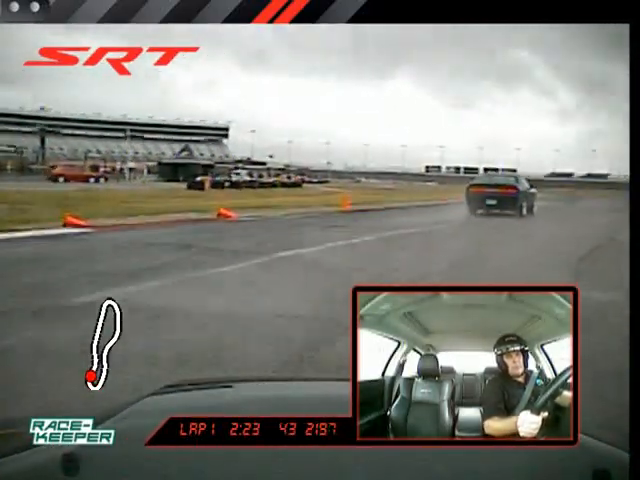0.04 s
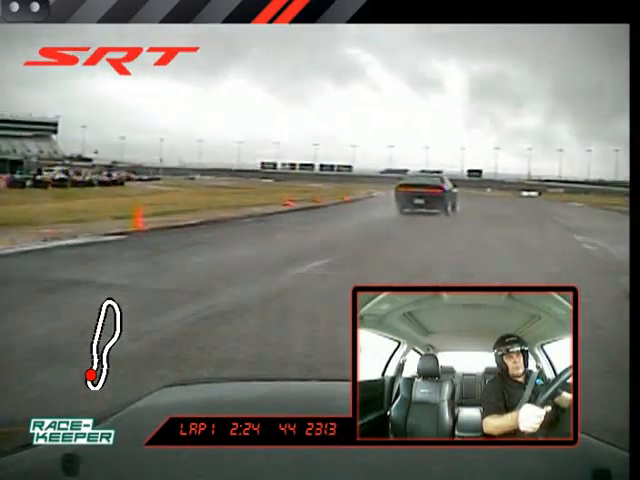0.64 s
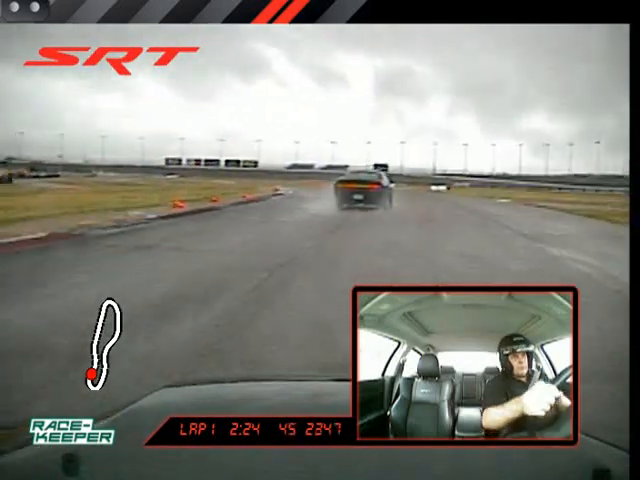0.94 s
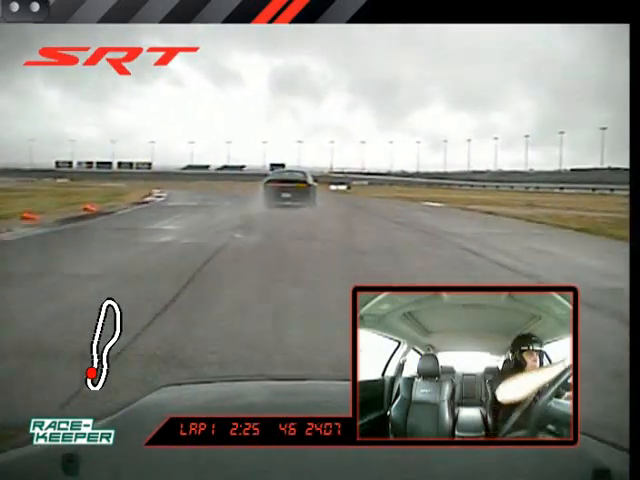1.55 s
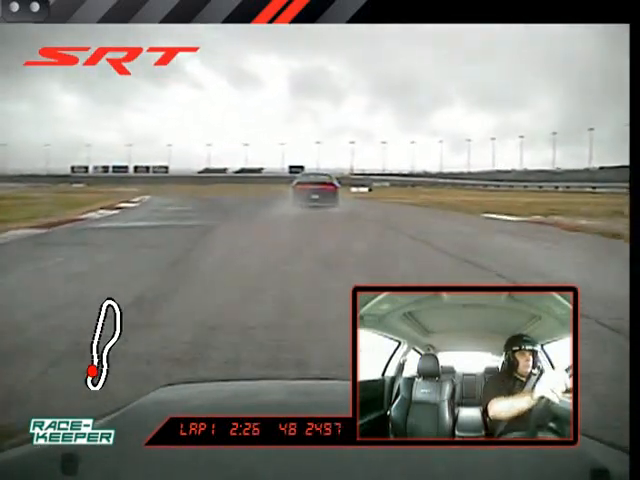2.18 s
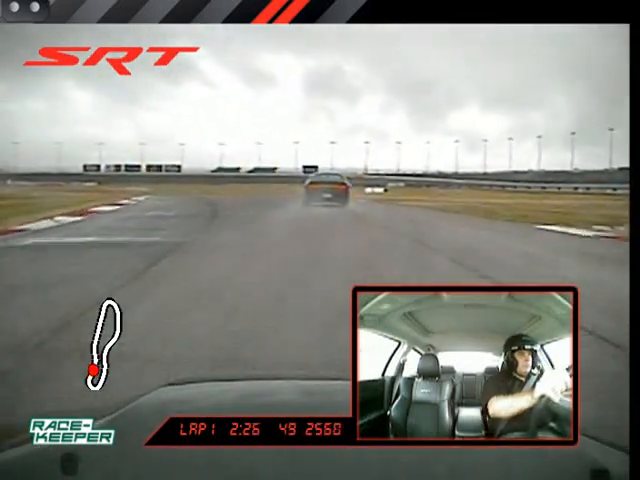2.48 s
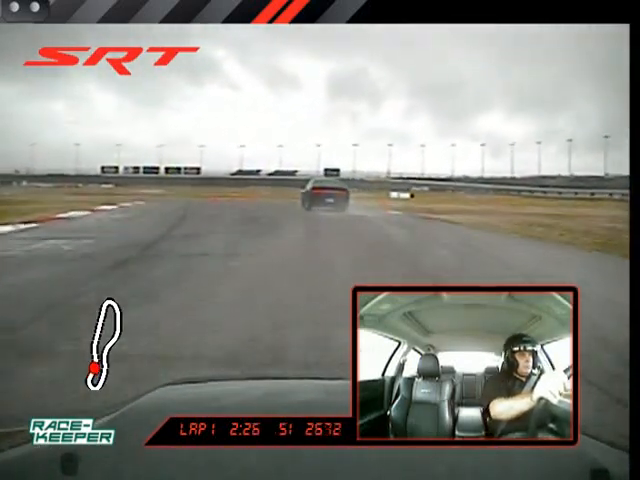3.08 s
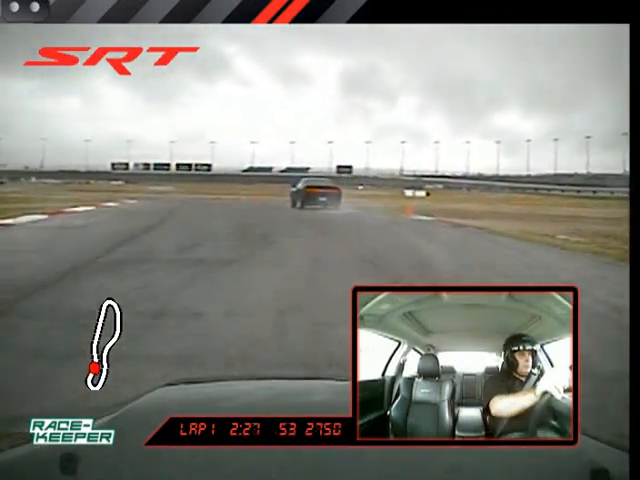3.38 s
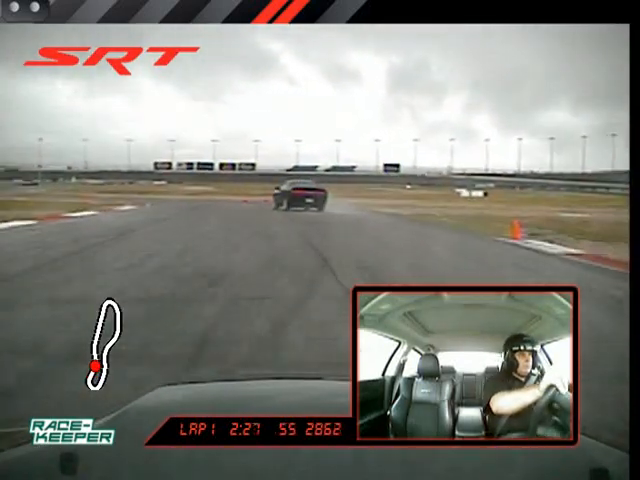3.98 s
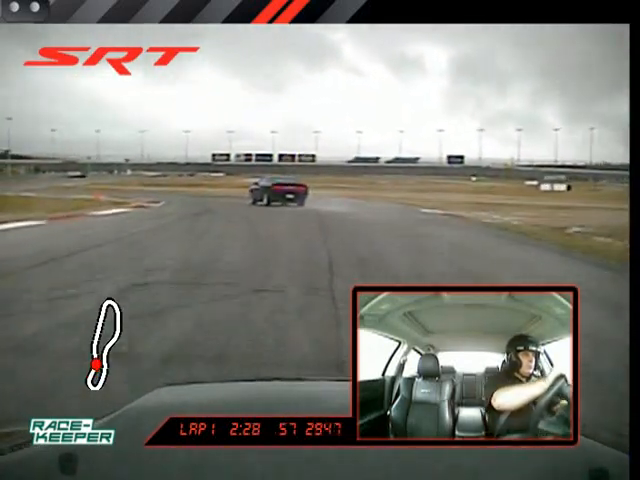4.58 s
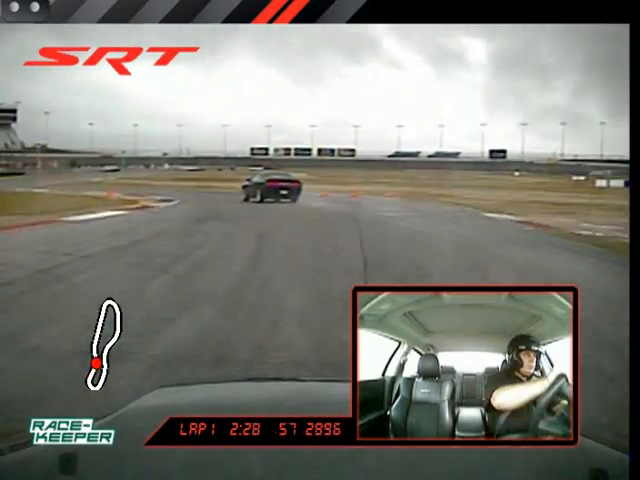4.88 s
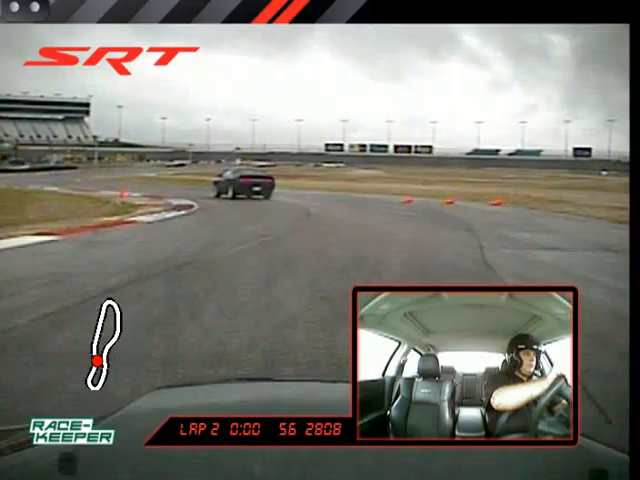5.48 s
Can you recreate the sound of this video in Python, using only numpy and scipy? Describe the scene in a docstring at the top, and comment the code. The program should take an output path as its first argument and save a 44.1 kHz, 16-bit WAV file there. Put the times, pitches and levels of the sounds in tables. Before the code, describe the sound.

A V8 car engine throbs and revs up, then eases off, heard from inside over tyre roar, with light scuffs and clicks.

```python
"""Inside a V8 car on a damp race track. It rolls through a bend, pulls from 2400 to 3000 rpm and lifts
off at four seconds. Uneven firing makes a harmonic series that throbs through the cabin's resonances,
over the broadband noise of road, tyres and wind; bumps make the cabin air boom. While the wheel is
wound over, something, probably a sleeve or belt, scuffs by stick-slip friction and the trim clicks."""
import sys
import numpy as np
from scipy import signal
from scipy.fft import rfft, irfft, next_fast_len
from scipy.io import wavfile
from scipy.ndimage import uniform_filter1d

SR = 44100
rng = np.random.default_rng(int(sys.argv[2]) if len(sys.argv) > 2 else 0)


def unload_wav(signal):
    """Save mono or channel-first audio to the path in sys.argv[1] as 16-bit WAV at rate SR, clipped to [-1, 1]."""
    wavfile.write(
        sys.argv[1],
        SR,
        np.round(np.clip(np.atleast_2d(signal).T, -1, 1) * 32767).astype(np.int16),
    )


N = 248724
TIME = np.arange(N) / SR


def from_db(db):
    """Amplitude ratio of a level in decibels."""
    return 10 ** (np.asarray(db) / 20)


def rms_one(x):
    """Normalisation to unit rms."""
    return x / np.sqrt(np.mean(x ** 2) + 1e-20)


def in_time(rows):
    """Linear interpolation of each column of a curve to every sample."""
    time_s, *columns = np.transpose(rows)
    return [np.interp(TIME, time_s, column) for column in columns]


def ramp(start_s, length_s):
    """Linear rise from 0 to 1, then held."""
    return np.clip((TIME - start_s) / length_s, 0, 1)


def at_hz(spectrum, hz):
    """Spectral level in dB, interpolated in log frequency."""
    points_hz, points_db = np.transpose(spectrum)
    return np.interp(np.log(hz), np.log(points_hz), points_db)


def peaks_db(peaks, hz):
    """Resonance: each mode adds a Lorentzian peak or dip in dB."""
    return sum(db / (1 + (2 * (hz - centre) / width) ** 2) for centre, width, db in peaks)


def drift(rate_hz):
    """Slow random modulation of unit rms: noise twice through a one-pole low-pass."""
    step, settle = 40, 2000
    pole = np.exp(-2 * np.pi * step * rate_hz / SR)
    white = rng.standard_normal(N // step + settle + 2)
    slow = signal.lfilter([1], [1, -2 * pole, pole * pole], white)[settle:]
    return np.interp(np.arange(N) / step, np.arange(len(slow)), rms_one(slow))


def noise(spectrum, peaks=()):
    """Spectrally shaped noise of unit rms, rolling off beyond the ends of the spectrum."""
    size = next_fast_len(N)
    hz = np.maximum(np.arange(size // 2 + 1) * SR / size, 1)
    gain = from_db(at_hz(spectrum, hz) + peaks_db(peaks, hz))
    gain *= np.minimum(hz / spectrum[0][0], 1) ** 2 * np.minimum(spectrum[-1][0] / hz, 1) ** 2
    return rms_one(irfft(rfft(rng.standard_normal(size)) * gain, size)[:N])


def steady(x, window_s=0.18):
    """Division by the running rms evens out swells, as in a tyre rolling at constant speed."""
    return x / np.sqrt(uniform_filter1d(x ** 2, round(window_s * SR)) + 1e-9)


# Spray envelope: time_s, relative_db
SPRAY_LEVEL = [(0.05, -53), (0.41, -54.5), (1.02, -54.5), (1.36, -46.5), (1.79, -51.5), (4.1, -55.5),
               (4.3, -52), (5.6, -52)]
# Spray spectrum: frequency_hz, density_db
SPRAY_SPECTRUM = [(1500, -1.5), (3000, 1.5), (4800, -1), (6000, -5.5), (7200, -8), (8500, -3.5), (9600, -5),
                  (11000, -2), (12700, 4), (13600, 0)]


def spray(gain_db=1.0, flicker_db=1.56):
    """Broadband hiss: water is thrown off the wet tarmac."""
    level_db, = in_time(SPRAY_LEVEL)
    return from_db(level_db + gain_db + flicker_db * drift(37)) * noise(SPRAY_SPECTRUM)


# Envelope of tyre roar and wind: time_s, relative_db
ROAR_LEVEL = [(0.05, -34.5), (0.19, -37.5), (1.02, -41.5), (1.46, -36.5), (3.17, -34), (4.13, -35.5),
              (4.47, -30), (4.59, -35.5), (4.83, -30.5), (5.6, -30.5)]
# Roar spectrum: frequency_hz, density_db
ROAR_SPECTRUM = [(250, 1), (420, -6.5), (560, 2), (680, -2), (830, -3), (1100, -5.5), (1480, -13),
                 (1900, -21.5), (2500, -27), (3400, -33.5), (5000, -37), (7500, -44.5)]
# Tyre and panel resonances: centre_hz, width_hz, gain_db
ROAR_MODES = [(657, 8.4, 6.5), (720, 54, 5.5), (922, 16, -5.5), (1002, 34, 2.5), (1093.5, 24, 6),
              (1473, 31, 4.5)]


def roar(cycles, load_db, depth=0.024, gain_db=5.0, flicker_db=0.22):
    """Amplitude modulation: under load, tyre and wind noise pulses with the exhaust."""
    level_db, = in_time(ROAR_LEVEL)
    envelope = from_db(level_db + gain_db + flicker_db * drift(28))
    pulsing = 1 + depth * from_db(load_db) * np.cos(2 * np.pi * 2 * cycles)
    return envelope * pulsing * noise(ROAR_SPECTRUM, ROAR_MODES)


# Spectrum of the air in the tyres: frequency_hz, density_db
HUM_SPECTRUM = [(90, -18), (115, 0.5), (145, -6), (175, -8), (208, 5.5), (240, -1.5), (290, -17.5),
                (380, -32.5)]


def tyre_hum(level_db=-20.5, waver_db=2):
    """Cavity resonance: the air in the tyres hums as they load up for the next bend."""
    envelope = from_db(level_db + waver_db * drift(17)) * ramp(start_s=3.81, length_s=0.97)
    return envelope * steady(noise(HUM_SPECTRUM))


# Road surface, smoothest along the pull: time_s, rumble_db, drone_db
ROAD_LEVELS = [(0, -18, -16.5), (.35, -14, -23), (.8, -15, -25.5), (1.3, -19, -25), (2.5, -19, -20.5),
               (3.7, -17.5, -32), (4.25, -19, -24), (4.85, -16, -21.5), (5.64, -14, -21)]
# Suspension rumble: frequency_hz, density_db
RUMBLE_SPECTRUM = [(8, -29), (16, -42), (28, -2.5), (48, -7.5), (78, -4), (98, -16.5), (140, -20),
                   (250, -89)]
# Tyre drone: frequency_hz, density_db
DRONE_SPECTRUM = [(70, -2), (115, -3.5), (145, -1.5), (185, -7.5), (212, 1), (245, 0.5), (290, -4),
                  (350, -2), (430, -14), (600, -37), (1000, -31)]
# Panels that the drone excites: centre_hz, width_hz, gain_db
DRONE_MODES = [(316, 12, -4), (401, 11, 6.5)]


def road():
    """Forced vibration: the road surface makes the suspension rumble and the tyres drone."""
    rumble_db, drone_db = in_time(ROAD_LEVELS)
    rumble = from_db(rumble_db) * steady(noise(RUMBLE_SPECTRUM))
    drone = from_db(drone_db) * steady(noise(DRONE_SPECTRUM, DRONE_MODES))
    return rumble + drone


# Cabin booms and rings: centre_s, pitch_hz, peak_db, half_length_s
BUMPS = [(0.061, 91, -10.5, 0.025), (0.17, 67, -0.5, 0.028), (1.021, 53, -7, 0.02),
         (1.114, 70.7, -11, 0.06), (1.143, 322, -22, 0.037), (2.778, 44, -7, 0.021),
         (2.948, 41.5, -5.5, 0.014), (3.161, 44, -3, 0.021), (3.338, 48, -14, 0.014),
         (4.527, 45.6, -1.5, 0.029), (5.338, 45.3, -5, 0.042)]


def bumps():
    """Transient excitation, mostly by bumps: the cabin air swings in Gaussian tone bursts."""
    out = np.zeros(N)
    for centre_s, pitch_hz, peak_db, half_length_s in BUMPS:
        offset_s = TIME - centre_s
        envelope = from_db(peak_db) * np.exp(-(offset_s / half_length_s) ** 2)
        out += envelope * np.cos(2 * np.pi * pitch_hz * offset_s)
    return out


def crackle(per_s=450, size_db=0.0, grain_s=0.00064, floor=0.63):
    """Shot noise: a gain of unit rms that jumps at each of many tiny random catches."""
    catches = (rng.random(N) < per_s / SR) * from_db(size_db * np.minimum(rng.exponential(1, N), 2))
    grains = signal.lfilter([1], [1, -np.exp(-1 / (grain_s * SR))], catches + 1e-18)
    return rms_one(floor + grains)


# Slide envelope: time_s, level_db
SLIDE_LEVEL = [(1.36, -75), (1.42, -50), (1.48, -42), (1.575, -38.5), (1.595, -52), (1.7, -53), (1.78, -78)]
# Sliding cloth: frequency_hz, density_db
SLIDE_SPECTRUM = [(2000, -20), (3700, -22), (4500, -5), (6100, -11), (7300, -21), (8400, -8), (9600, -15),
                  (12700, -2.5), (14000, -11)]


def cloth_slide():
    """Sliding friction: one grainy rub swells, lets go and trails off."""
    level_db, = in_time(SLIDE_LEVEL)
    grain = crackle(per_s=250, size_db=2.0, grain_s=.001, floor=1.2)
    return from_db(level_db) * grain * noise(SLIDE_SPECTRUM)


# Slips of the cloth: start_s, relative_db, dull_offset_db, hold_s
SCUFFS = [(0.654, -36.5, -17, .008), (0.703, -29, -23, 0.0088), (0.723, -32, -22, 0.012),
          (0.746, -31, -26, .008), (.768, -32, -25, .008), (.787, -41, -10, .006),
          (0.802, -27.5, -18.5, 0.0087), (0.922, -25, -37, 0.012), (1.057, -32, -31, .008),
          (1.081, -24.5, -20, .011), (1.117, -31, -22.5, .008), (1.13, -30, -22, .012),
          (1.177, -34, -15, 0.0089), (1.2, -25.5, -21, 0.0092), (1.213, -46, -22, .008),
          (1.247, -45, -7, .005), (1.28, -36.5, -5.5, 0.0074), (2.041, -24.5, -32, 0.0088),
          (2.094, -35, -11, .003), (2.108, -38, -10, .005), (4.187, -35, -16.5, .008),
          (4.842, -36, -13, .005)]
# Bright part of a slip: frequency_hz, density_db
BRIGHT_SPECTRUM = [(5000, -8), (7300, -11), (8500, -15), (9800, -5.5), (11500, 2.5), (12700, 10.5),
                   (14000, -1.5)]
# Dull part of a slip: frequency_hz, density_db
DULL_SPECTRUM = [(1000, -15), (2000, 3.5), (3500, -1.5), (4600, 5.5), (5900, 5), (7200, -19), (8600, 2.5),
                 (11000, -32)]


def cloth_scuffs(bright_db=-13.0, dull_db=0.5, rise_s=0.00047, t60_s=0.076):
    """Stick-slip friction: cloth catches and lets go in crackling bursts, some bright, some dull."""
    bright, dull = np.zeros(N), np.zeros(N)
    for start_s, relative_db, dull_offset_db, hold_s in SCUFFS:
        decay_db = 60 * np.clip(TIME - start_s - hold_s, 0, 1) / t60_s
        burst = from_db(relative_db - decay_db) * ramp(start_s, rise_s)
        bright += burst * from_db(bright_db)
        dull += burst * from_db(dull_offset_db + dull_db)
    return crackle() * (bright * noise(BRIGHT_SPECTRUM) + dull * noise(DULL_SPECTRUM))


# Taps of the trim: start_s, ring_db, tilt_db_per_octave, crack_db, pitch_ratio
CLICKS = [(.701, -46, 0, -40, 0.89), (.749, -48, 1, -39, 0.85), (0.804, -42, 2, -35, 0.83),
          (.933, -52, 8, -38, 1), (1.057, -54, 4, -45, 1.2), (1.089, -37, 2, -38, 1.05),
          (1.281, -35, 0, -41, 0.85), (1.289, -34, 1, -46, 1.02), (1.3015, -37, -3, -45, 0.77),
          (1.355, -33.5, -10, -40, 1.05), (1.3666, -25.5, -3, -33, 0.87), (2.042, -35, 3, -36, 0.79),
          (2.098, -38, 1, -42, 1.5), (2.129, -50, 3, -42, 1), (4.203, -36, 0, -41, 1.1),
          (4.8369, -36, 4, -33.5, 1.05), (5.015, -41, 1, -47, 1.3), (5.301, -31, -1, -44, 0.98)]
# Trim modes at a pitch ratio of 1: pitch_hz, relative_db, t60_s
TRIM_MODES = [(1380, -3, 0.022), (1600, -5, .02), (1900, -8, .015), (2400, -6, .014), (3580, -8, 0.019),
              (4700, -11, 0.022), (5040, -11, .012), (5600, -6, .01), (9150, -20, .008), (12700, -17, .008)]
# Contact noise: frequency_hz, density_db
CRACK_SPECTRUM = [(2000, -7), (5000, -3), (7300, 3), (10000, 0), (12200, 11), (13500, 0)]


def trim_clicks(ring_gain_db=-1.0, scatter_db=3.0, pivot_hz=3000, crack_t60_s=0.0092):
    """Impact on plastic: each tap cracks, then rings in damped modes at its own pitch and brightness."""
    out, age_s = np.zeros(N), np.arange(SR // 10) / SR
    hz, mode_db, t60_s = np.transpose(TRIM_MODES)[:, :, None]
    octaves = np.log2(hz[:, 0] / pivot_hz)
    contact = noise(CRACK_SPECTRUM)
    for start_s, ring_db, tilt, crack_db, pitch_ratio in CLICKS:
        modes = from_db(mode_db - 60 * age_s / t60_s) * np.sin(2 * np.pi * pitch_ratio * hz * age_s)
        strengths = from_db(ring_db + ring_gain_db + tilt * octaves + rng.normal(0, scatter_db, len(hz)))
        span = slice(round(start_s * SR), round(start_s * SR) + len(age_s))
        out[span] += (strengths * rng.choice([-1, 1], len(hz))) @ modes
        out[span] += from_db(crack_db - 60 * age_s / crack_t60_s) * contact[span]
    return out


# Whine envelope: time_s, level_db
WHINE_LEVEL = [(0, -36), (.45, -30.5), (.65, -47), (1.6, -48), (2.25, -44), (2.5, -35.5), (3.1, -28),
               (3.65, -30.5), (4.05, -31.5), (4.2, -50)]


def whine(cycles, multiple=21.1, waver_db=1.5, flutter_rad=.35):
    """Rotational tone: probably a pulley or gear, wavering just off an exhaust harmonic."""
    level_db, = in_time(WHINE_LEVEL)
    amplitude = np.sqrt(2) * from_db(level_db + waver_db * drift(17))
    return amplitude * np.sin(2 * np.pi * multiple * cycles + flutter_rad * drift(11))


def cabin_boom(cycles, level_db=-12.5, waver_db=1.0):
    """Driven resonance: with the throttle eased, the cabin booms on the engine's third harmonic."""
    envelope = ramp(start_s=.42, length_s=.065) * (1 - ramp(start_s=.91, length_s=.21))
    harmonic = np.sqrt(2) * np.sin(2 * np.pi * 3 * cycles)
    return from_db(level_db + waver_db * drift(6.4)) * envelope * harmonic


# Engine speed: time_s, cycle_hz (four-stroke cycles, two crank turns each)
ENGINE_SPEED = [(0, 19.2), (.5, 19.99), (1.05, 20.47), (1.25, 19.94), (1.45, 20.74), (1.75, 21.02),
                (2, 21.49), (3, 23.21), (4.02, 24.93), (4.5, 23.69), (5.64, 22.92)]
# Load through part throttle, a pause, the pull and lift-off: time_s, load_db
ENGINE_LOAD = [(0, -9), (.15, -2.5), (.47, -2.5), (.6, -9.5), (1.08, -13.5), (1.3, -5.5), (1.55, -1.5),
               (1.95, 1.5), (2.5, 2), (2.95, 0.7), (3.8, 1.5), (4.02, -1.5), (4.2, -16.5), (5.64, -35)]
# Exhaust spectrum before weighting: frequency_hz, level_db
EXHAUST_SPECTRUM = [(20, -18.5), (46, -15.5), (70, -26.5), (110, -30), (170, -26.5), (260, -34.5),
                    (380, -40.5), (600, -41.5), (750, -40)]
# Exhaust and cabin resonances: centre_hz, width_hz, gain_db
CABIN_MODES = [(48.5, 6, 4), (162, 19, 10), (190, 8, 7), (205, 16, -5), (228, 23, 7), (256, 20, 7),
               (300, 10, -3), (327, 28, 17.5), (376, 27, 4.5), (430, 18, 6), (491, 48, -4), (535, 22, 5),
               (606, 14, 6), (634, 14, 6), (660, 40, 11)]
# Uneven beat: gain_db at 0 to 4 harmonics from a multiple of the firing rate
FIRING_PATTERN_DB = [0.5, -6, -4, -2, -9]
# Harmonics that unequal pipes favour or damp: harmonic_number -> gain_db
PIPE_GAIN_DB = {4: 4, 5: -1, 6: 1.5, 7: -2.5, 8: -1.5, 9: 2, 10: 4.5, 11: 1.5, 12: 3.5, 13: 4.5, 14: -1.5,
                15: -4, 16: 1.5, 18: 3, 19: -1, 23: 2, 24: -3, 25: -3, 28: -2, 29: -8}
# Each beat sweeps up at low revs (first row), down at high: lead_cycles, delay_per_harmonic_cycles
DISPERSION = [(.99, .09), (.45, -.2)]


def engine(cycle_hz, cycles, load_db, cylinders=8, harmonics=29):
    """Source and filter: harmonics of the cycle rate, weighted by uneven firing, cross fixed modes."""
    throb_hz, growl_hz = 22.4, 23.4  # cycle rates between which the timbre changes
    first_rasp_harmonic, rasp_db = 26, 6
    shake_hz, shake_load_share = 125, 0.27
    wobble_cycles, churn_db, spread = 0.0024, .8, .18
    out = np.zeros(N)
    # the crank never turns quite evenly, and some cycles fire harder than others
    crank = cycles + wobble_cycles * drift(4.2)
    effort_db = load_db + churn_db * drift(19)
    revved = np.clip((cycle_hz - throb_hz) / (growl_hz - throb_hz), 0, 1)
    for k in range(1, harmonics + 1):
        hz = k * cycle_hz
        pattern_db = FIRING_PATTERN_DB[min(k % cylinders, -k % cylinders)] + PIPE_GAIN_DB.get(k, 0)
        level_db = pattern_db + at_hz(EXHAUST_SPECTRUM, hz) + peaks_db(CABIN_MODES, hz)
        if k >= first_rasp_harmonic:  # the rasp opens with the revs
            level_db -= rasp_db * (1 - revved)
        # the lowest harmonics are the block shaking on its mounts and depend little on load
        load_share = shake_load_share + (1 - shake_load_share) / (1 + (shake_hz / hz.mean()) ** 12)
        # pipes and body delay the harmonics unequally, and differently as the revs rise
        low, high = [k * lead - delay * k * (k - 1) / 2 for lead, delay in DISPERSION]
        shortest_turn = (high - low + .5) % 1 - .5
        phase = 2 * np.pi * (k * crank + low + revved * shortest_turn)
        phase += .45 * drift(.8)  # small cabin modes slowly turn the phase
        # no two combustions are alike
        strength = 1 + spread * drift(4)
        phase += spread * np.sqrt(k / cylinders) * drift(8)
        out += from_db(level_db + load_share * effort_db) * strength * np.cos(phase)
    return np.sqrt(2) * out


def scene():
    """Superposition of all sources in the cabin, in mono."""
    cycle_hz, = in_time(ENGINE_SPEED)
    load_db, = in_time(ENGINE_LOAD)
    cycles = np.cumsum(cycle_hz) / SR
    motor = engine(cycle_hz, cycles, load_db) + whine(cycles)
    rolling = road() + tyre_hum() + roar(cycles, load_db) + spray()
    cabin = cabin_boom(cycles) + bumps() + cloth_slide() + cloth_scuffs() + trim_clicks()
    return (motor + rolling + cabin)[None]


def record(dry, cutoff_hz=13500):
    """Soft saturation rounds the largest swings; a steep low-pass cuts the top."""
    rounded = dry / (1 + dry ** 16) ** (1 / 16)
    return signal.sosfilt(signal.ellip(10, .3, 80, cutoff_hz, fs=SR, output="sos"), rounded)


dry = scene()
out = record(dry)
unload_wav(out)
```